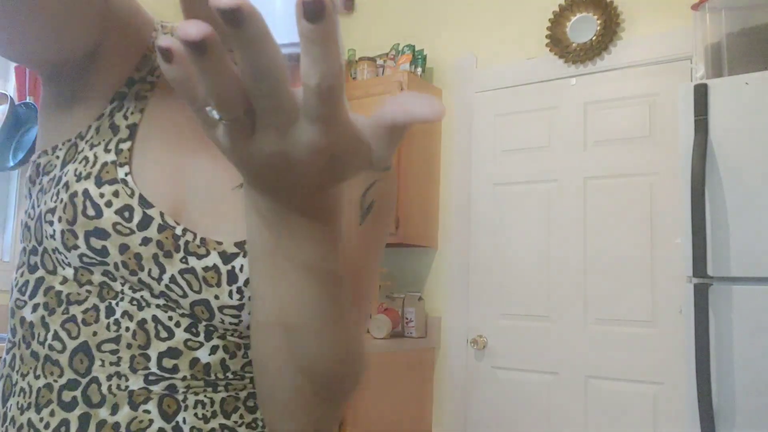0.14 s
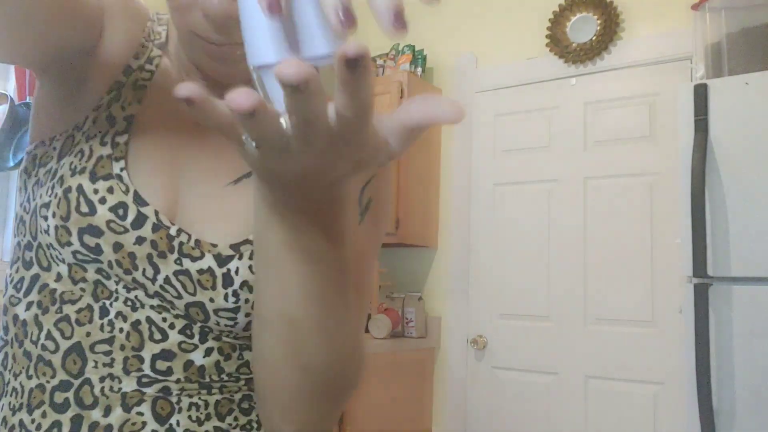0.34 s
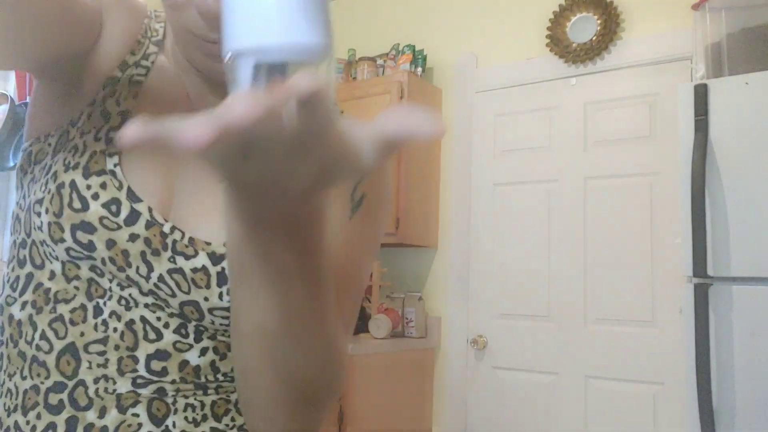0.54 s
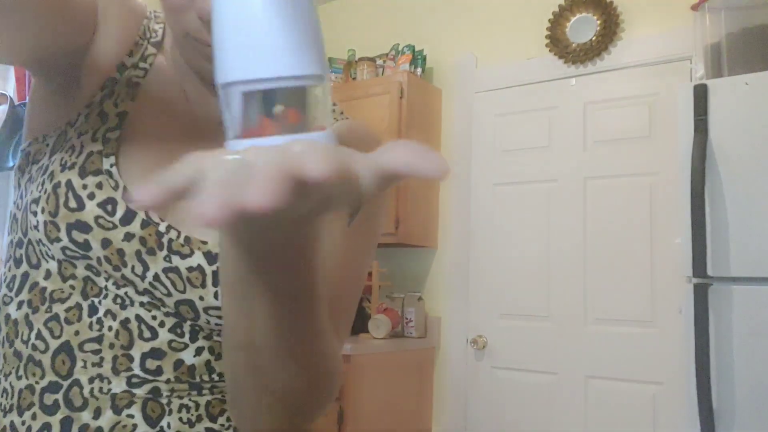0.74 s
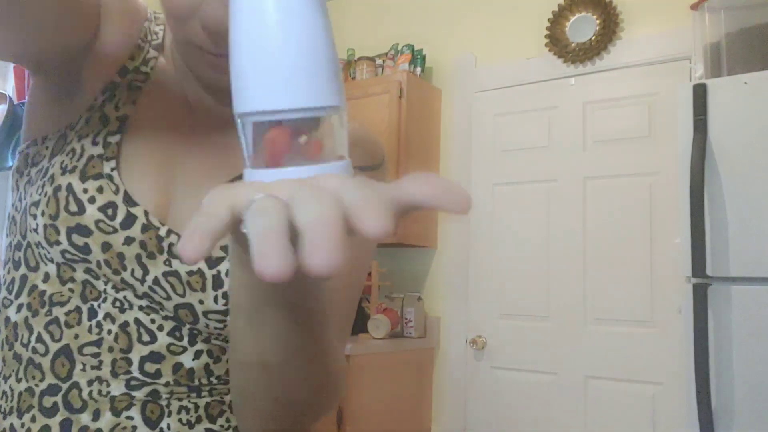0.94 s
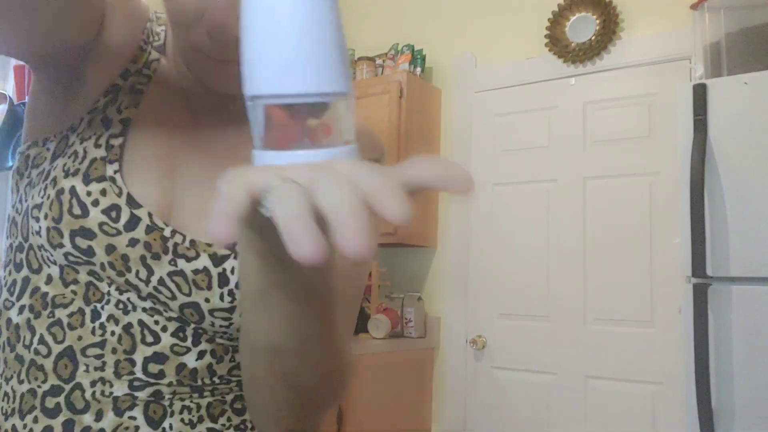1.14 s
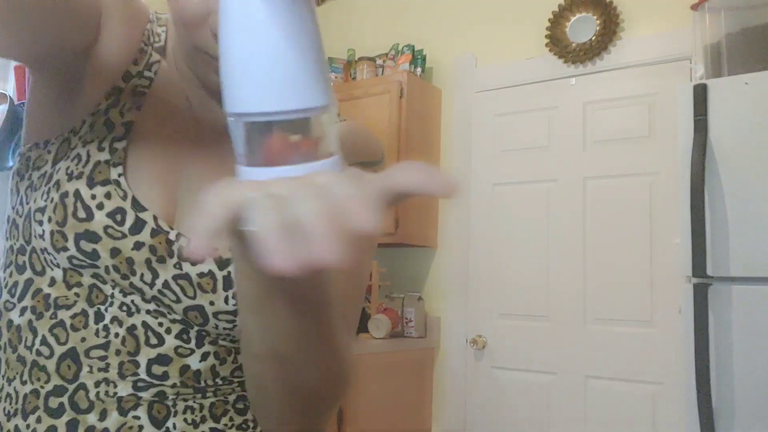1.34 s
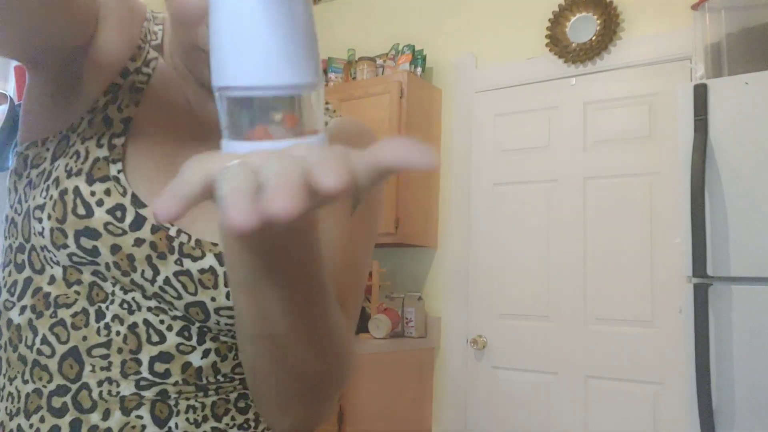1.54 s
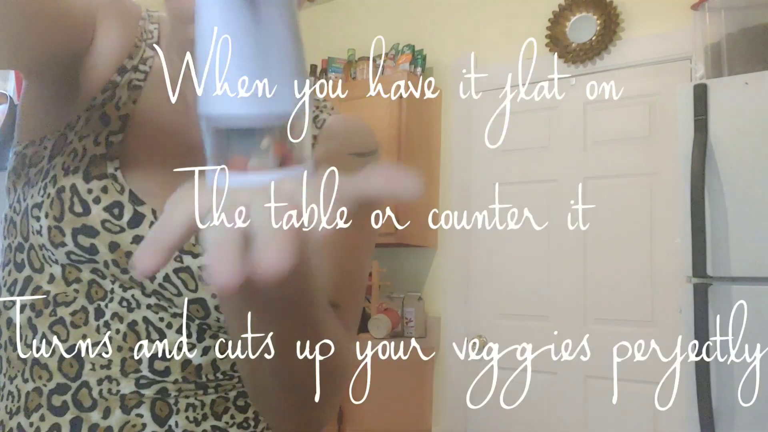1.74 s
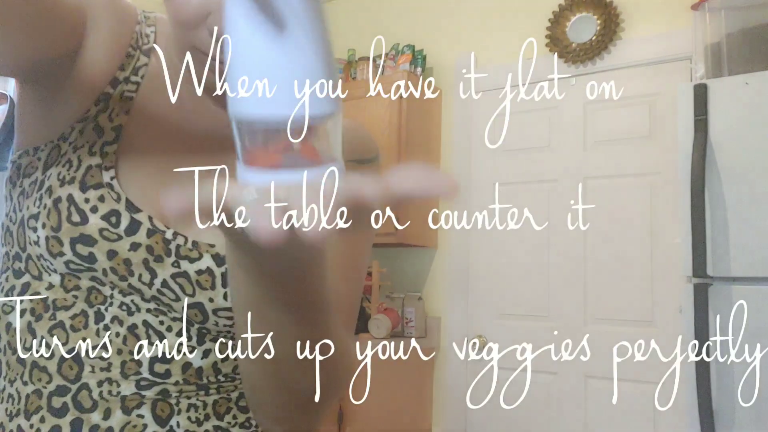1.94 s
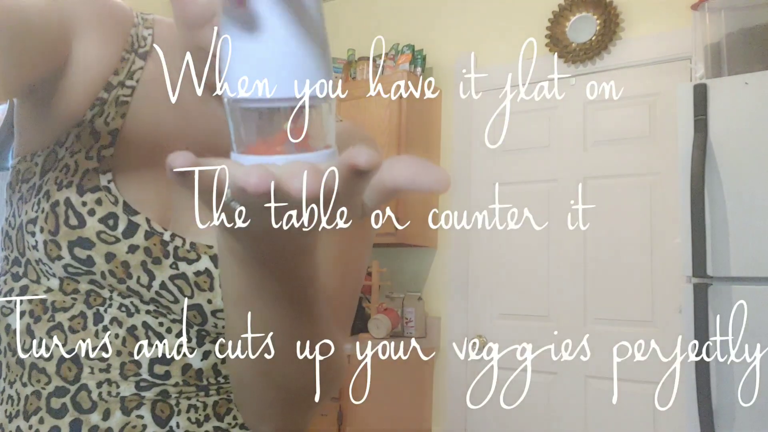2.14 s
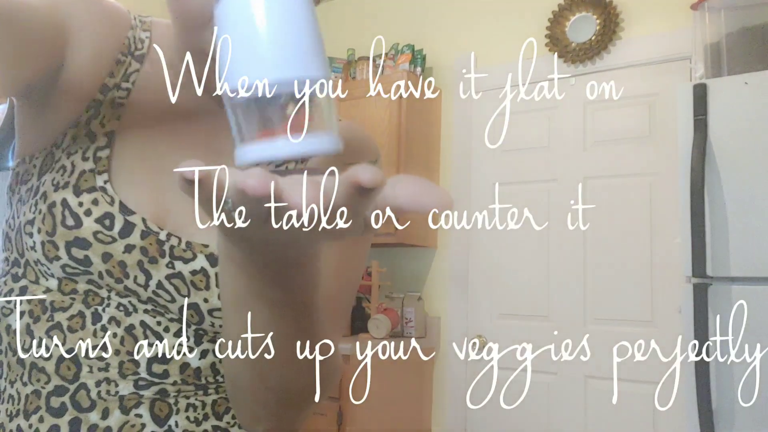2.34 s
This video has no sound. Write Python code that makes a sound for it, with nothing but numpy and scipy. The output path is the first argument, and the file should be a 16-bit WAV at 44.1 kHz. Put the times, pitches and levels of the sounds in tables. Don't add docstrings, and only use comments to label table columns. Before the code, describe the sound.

Close phone pickup in a reverberant home kitchen: a spring-loaded plastic chopper squeaks down, knocks dully and clatters back up, eight quick cycles, then the echo fades into low house rumble and refrigerator hum.

```python
import sys
import numpy as np
from scipy import signal
from scipy.fft import rfft, irfft, next_fast_len
from scipy.io import wavfile
from scipy.ndimage import uniform_filter1d

SR = 44100
rng = np.random.default_rng(int(sys.argv[2]) if len(sys.argv) > 2 else 0)


def decibels_to_gain(level_db):
    exponent = np.asarray(level_db, float) / 20
    return 10 ** exponent


def dump_mix(stems):
    frames = np.atleast_2d(stems).T
    limited = np.clip(frames, -1, 1)
    pcm = np.round(limited * 32767).astype(np.int16)
    wavfile.write(sys.argv[1], SR, pcm)


N = 110250

# (frequency [Hz], density [dB per Hz])
HOUSE_SPECTRUM = [(25, -12.5), (55, -5.5), (84, -14.5), (223, -11), (600, -27), (1200, -28), (8000, -47),
                  (9000, -62), (16000, -71)]
# (frequency [Hz], width [Hz], level
# [dB])
STEADY_BANDS = [(234, 7.4, -54.5), (271.7, 11, -56.5), (7100, 300, -79.5)]
# (frequency [Hz], level [dB rms])
HUM_LINES = [(45, -52), (60, -56), (119, -58)]
# (frequency [Hz], correlation [0-1])
HOUSE_LIKENESS = [(60, .98), (250, .92), (600, .6), (1500, .1), (4000, 0)]
# (frequency [Hz], T60 [s])
KITCHEN_T60 = [(200, 1), (1000, 0.42), (4000, 0.44), (8000, 0.43), (14000, 0.33)]
# (frequency [Hz], correlation [0-1])
TAIL_LIKENESS = [(60, .97), (250, .88), (600, .5), (1500, .05), (4000, 0)]
# (frequency [Hz], level [dB])
WALL_LEVEL = [(150, -12), (500, -7), (1500, -5.5), (4000, -4), (7000, -4), (14000, 1)]
# (frequency [Hz], left over right [dB])
PORT_TILT = [(60, 11), (130, -0.5), (290, -2.5), (640, 1.5), (1410, -1), (3100, -1), (6820, -4), (15000, 6)]
# (frequency [Hz], left lead [rad])
PORT_LEAD = [(300, -1), (1000, 1.34), (2000, 1.5), (3500, 2.5), (7500, 4.5), (16000, 9)]
# (frequency [Hz], width [Hz], level [dB])
CUP_MODES = [(774, 360, -5), (1242, 590, 0.5), (1700, 530, -5), (2450, 1110, -8)]
# (frequency [Hz], width [Hz], level [dB])
SHELL_MODES = [(1150, 1200, -3), (1480, 263, -2.5), (1950, 730, 0.5), (2250, 600, -3.5),
               (3130, 1200, -12.5)]
# (frequency [Hz], width [Hz], level [dB])
HIGH_MODES = [(6910, 540, -3), (7320, 680, -2.5), (7687, 390, -15.5), (9900, 990, -18),
              (11900, 1200, -18.5), (12400, 2500, -24)]
# (frequency [Hz], width [Hz], level [dB])
BLADE_MODES = [(4400, 600, 5), (5200, 900, -1), (3400, 900, -9)]
# (frequency [Hz], width [Hz], level [dB])
PALM_MODES = [(278, 135, -6), (444, 126, -0.5)]
# (frequency [Hz], width [Hz], level [dB])
ARM_MODES = [(107, 27, 0), (188, 220, -5)]
# (frequency [Hz], level [dB])
RASP_SPECTRUM = [(300, -3), (1000, 2), (2500, -3), (4400, 0.5), (7000, -2.5), (9000, -15), (12000, -10),
                 (15500, -43)]
# (time [s], length [s], level [dB], squeak [Hz], rasp over squeak [dB])
STROKES = [(.173, .03, -37.5, 1700, 11), (0.191, 0.025, -30, 2050, -2), (.388, 0.033, -33.5, 2330, 11),
           (0.492, 0.018, -25, 2100, 0.5), (0.631, 0.054, -31, 2110, 0.5), (0.741, 0.027, -22.5, 2100, 1),
           (.886, 0.061, -30, 2110, 2.5), (0.984, 0.013, -20.5, 1890, 0), (1.129, 0.033, -28, 2150, 3.5),
           (1.22, 0.02, -25, 1920, 1.5), (1.346, 0.051, -29, 2110, 2), (1.445, 0.017, -24, 1950, 5.5),
           (1.589, 0.032, -33, 1990, 5.5), (1.66, 0.032, -28, 2250, 4), (1.848, 0.019, -33, 2170, 2),
           (1.86, 0.024, -28.5, 1800, -1), (1.907, 0.021, -29.5, 1080, 1.5)]
# (time [s], peak [dB], bright part [dB], cup ring [dB], depth [dB])
BOTTOMS = [
    (0.212, -20.5, -19, -39.5, 3.5),
    (0.415, -11, -26.5, -33, -4),
    (0.677, -10, -21.5, -30.5, -2),
    (0.933, -17.5, -26, -34.5, -3),
    (1.165, -14, -18.5, -33, 0.5),
    (1.39, -14, -28.5, -38, -2),
    (1.624, -10, -17.5, -36, -2),
    (1.893, -10, -19.5, -34, -5),
]
# (time [s], body [dB], bright part [dB], body pitch [Hz], blade [dB])
STOPS = [
    (0.216, -16, -22.5, 1630, -33),
    (0.506, -15.5, -15.5, 1650, -26.5),
    (0.764, -18.5, -14, 1340, -23.5),
    (1.004, -15, -43, 1870, -34),
    (1.242, -18, -16.5, 1890, -24),
    (1.464, -15, -16.5, 1856, -25),
    (1.689, -16.5, -20.5, 1110, -25),
    (1.916, -19.5, -19, 1040, -26),
]
# (time [s], level [dB], frequency [Hz])
HIGH_SNAPS = [
    (0.214, -27.5, 11900),
    (0.51, -30, 11900),
    (.768, -34, 11400),
    (.996, -41.5, 9900),
    (1.243, -30.5, 12900),
    (1.693, -23.5, 11900),
    (1.915, -39, 11900),
]
# (time [s], level [dB], length [s])
LAST_SETTLE = (2.283, -69, 0.0086)

HOUSE_DB, GAIN_OPENS_S, GAIN_OPENING_S, GAIN_SHUT_DB = -48, .15, .025, -9.5
FIRST_WALL_S = .006
NEAR_S, NEAR_DB = .002, -14
SCATTER_DB = 1.5
CONTACT_S = .002
GRIT_DB, SQUEAK_WIDTH_HZ = 2.5, 320
REST_LONGER_THAN_S = .032
STARTS_LOW, GLIDE_S = .76, .042
SWELL_DB, REST_SWELL_DB, RASP_SWELL_DB, LET_GO_S = 6, 3.5, 14, .004
THUD_S, LEAD_S, LEAD_DB = .003, .0045, -14
CUP_HZ, CUP_T60_S, CUP_RISE_HZ, CUP_SWELL_S = 678, .12, 80, .026
RATTLE_S, BODY_WIDTH_HZ, BODY_DB, ARM_DB = .0075, 290, 1, -22
TOP_HZ = 16300


def unit(x):
    return x / np.sqrt(np.mean(x ** 2) + 1e-20)


def along(points, hz):
    f, v = np.transpose(points)
    return np.interp(np.log(hz + 1), np.log(f + 1), v)


def filtered(x, response):
    n = x.shape[-1]
    m = next_fast_len(n + 8192)
    return irfft(rfft(x, m) * response(np.fft.rfftfreq(m, 1 / SR)), m)[..., :n]


def resonant(x, peaks):
    def response(f):
        total = 0
        for k, (center, width, db) in enumerate(peaks):
            damping = 1j * f * width
            total = total + (-1) ** k * decibels_to_gain(db) * damping / (center * center - f * f + damping)
        return total
    return filtered(x, response)


def pair(x, likeness):
    def shares(hz):
        angle = np.arccos(np.clip(along(likeness, hz), -1, 1)) / 2
        return np.array([np.cos(angle), np.sin(angle)])
    mid, side = filtered(x, shares)
    return np.array([mid + side, mid - side])


def add(track, s, x):
    part = track[round(s * SR):][:len(x)]
    part += x[:len(part)]


def house():
    t = np.arange(N) / SR
    rumble = unit(filtered(rng.standard_normal((2, N)), lambda f: decibels_to_gain(along(HOUSE_SPECTRUM, f))))
    rumble = decibels_to_gain(HOUSE_DB - 1.5) * rumble
    drone = hum = 0
    for hz, width, db in STEADY_BANDS:
        drone = drone + decibels_to_gain(db) * unit(resonant(rng.standard_normal((2, N)), [(hz, width, 0)]))
    for hz, db in HUM_LINES:
        hum = hum + decibels_to_gain(db + 2) * np.sin(2 * np.pi * (hz * t + rng.random()))
    shut = np.clip((GAIN_OPENS_S + GAIN_OPENING_S - t) / GAIN_OPENING_S, 0, 1)
    return (pair(rumble + drone, HOUSE_LIKENESS) + hum) * decibels_to_gain(GAIN_SHUT_DB * shut)


def kitchen(x):
    out, step = np.zeros((2, N + SR)), SR // 8
    for k in range(0, N, step):
        hz, t, z = signal.stft(rng.standard_normal((2, SR * 3 // 4)), SR, nperseg=256)
        decay = decibels_to_gain(-60 * t / along(KITCHEN_T60, hz)[:, None])
        tail = pair(signal.istft(z * decay, SR, nperseg=256)[1], TAIL_LIKENESS)
        tail = tail / np.linalg.norm(tail[0])
        wet = signal.fftconvolve(x[None, k:k + step], tail, axes=1)
        out[:, k:k + wet.shape[1]] += wet
    return np.pad(out, ((0, 0), (round(FIRST_WALL_S * SR), 0)))[:, :N]


def near(x):
    taps = np.zeros((2, SR // 20))
    when = (rng.uniform(.05, 1, (2, 8)) * NEAR_S * SR).astype(int)
    np.put_along_axis(taps, when, decibels_to_gain(NEAR_DB) * rng.choice([-1, 1], (2, 8)), axis=1)
    echoes = filtered(taps, lambda f: 1j * f / (700 + 1j * f))
    return x + signal.fftconvolve(x, echoes, axes=1)[:, :N]


def blow(peaks, length_s, db):
    t = np.arange(SR // 10) / SR
    grit = decibels_to_gain(3 * unit(uniform_filter1d(rng.standard_normal(len(t)), size=30)))
    burst = grit * np.exp(-.5 * t / length_s - (t / length_s) ** 6)
    ring = 0
    for hz, width, mode_db in peaks:
        mode = resonant(burst * rng.standard_normal(len(t)), [(hz, width, 0)])
        mode = resonant(mode, [(hz, 2 * width, 0)])
        ring = ring + decibels_to_gain(mode_db + rng.normal(0, SCATTER_DB)) * unit(mode)
    return decibels_to_gain(db) * unit(ring) * np.sqrt(.037)


def knock(peaks, db):
    push = np.zeros(SR // 20)
    push[[0, round(.0012 * SR)]] = 1, rng.uniform(.38, .71)
    ring = resonant(resonant(push, peaks), [(930, 3880, 0)])
    return decibels_to_gain(db) * ring / np.abs(ring).max()


def slides():
    out = np.zeros(N)
    t = np.arange(SR // 8) / SR
    for s, length, db, hz, rasp_db in STROKES:
        grit = decibels_to_gain(GRIT_DB * unit(uniform_filter1d(rng.standard_normal(len(t)), size=90)))
        rub = unit(grit * rng.standard_normal((3, len(t))))
        squeaks = []
        for noise, center in zip(rub, (STARTS_LOW * hz, hz)):
            narrow = resonant(noise, [(center, SQUEAK_WIDTH_HZ, 0)])
            squeaks.append(unit(resonant(narrow, [(center, 3 * SQUEAK_WIDTH_HZ, 0)])))
        low, high = squeaks
        rasp = unit(filtered(rub[2], lambda f: decibels_to_gain(along(RASP_SPECTRUM, f))))

        from_rest = length > REST_LONGER_THAN_S
        glide = np.pi / 2 * (np.clip(t / GLIDE_S, 0, 1) if from_rest else 1)
        squeak = np.cos(glide) * low + np.sin(glide) * high
        left = np.minimum(t / length, 1) - 1
        swell = decibels_to_gain(db + (REST_SWELL_DB if from_rest else SWELL_DB) * left)
        release = np.exp(-np.maximum(t - length, 0) / LET_GO_S)
        shape = swell * release * np.minimum(t / .0015, 1)
        add(out, s, shape * (squeak + decibels_to_gain(rasp_db + RASP_SWELL_DB * left) * rasp))
    return out


def thuds():
    out, t = np.zeros(N), np.arange(SR // 4) / SR
    turns = np.cumsum(CUP_HZ - CUP_RISE_HZ * np.exp(-t / .03)) / SR
    hollow = decibels_to_gain(-60 * t / CUP_T60_S) * np.sin(2 * np.pi * turns) * np.minimum(t / CUP_SWELL_S, 1) ** 2
    for s, db, bright_db, ring_db, deep_db in BOTTOMS:
        s += CONTACT_S
        add(out, s - LEAD_S, blow(SHELL_MODES + BLADE_MODES, .0006, db + LEAD_DB - 10))
        add(out, s, knock(CUP_MODES, db))
        add(out, s, knock(PALM_MODES, db + deep_db - 4.5))
        add(out, s, blow(CUP_MODES, THUD_S, db - 11.5))
        add(out, s, blow(BLADE_MODES + HIGH_MODES, THUD_S, bright_db))
        add(out, s, decibels_to_gain(ring_db + 13) * hollow)
    return out


def clacks():
    out = np.zeros(N)
    for s, db, bright_db, hz, blade_db in STOPS:
        s += CONTACT_S
        add(out, s, blow(SHELL_MODES + [(hz, BODY_WIDTH_HZ, BODY_DB)], RATTLE_S, db - 1))
        add(out, s, blow(HIGH_MODES, RATTLE_S, bright_db + 1.5))
        add(out, s, blow(BLADE_MODES, .0042, blade_db + 6.5))
        add(out, s, knock(ARM_MODES, bright_db + ARM_DB))
    return out


def high_snaps():
    out = np.zeros(N)
    for s, db, hz in HIGH_SNAPS:
        add(out, s, blow([(hz, 500, 0)], .0071, db))
    s, db, length = LAST_SETTLE
    add(out, s, blow(HIGH_MODES[3:], length, db))
    return out


def scene():
    chopper = slides() + thuds() + clacks() + high_snaps()

    def ports(f):
        half = decibels_to_gain(along(PORT_TILT, f) / 2) * np.exp(.5j * along(PORT_LEAD, f))
        return np.array([half, 1 / half])

    direct = near(filtered(chopper, ports))
    wet = filtered(kitchen(chopper), lambda f: np.abs(ports(f)) * decibels_to_gain(along(WALL_LEVEL, f)))
    return direct + wet + house()


def low_pass(x):
    return signal.sosfilt(signal.butter(12, 16320, fs=SR, output="sos"), x)


def record(dry):
    mix = filtered(dry, lambda f: f < TOP_HZ)
    return low_pass(mix)


dry = scene()
out = record(dry)
dump_mix(out)
```